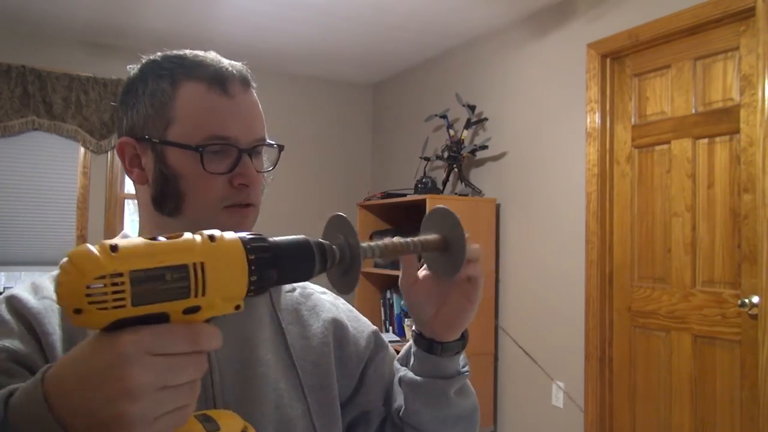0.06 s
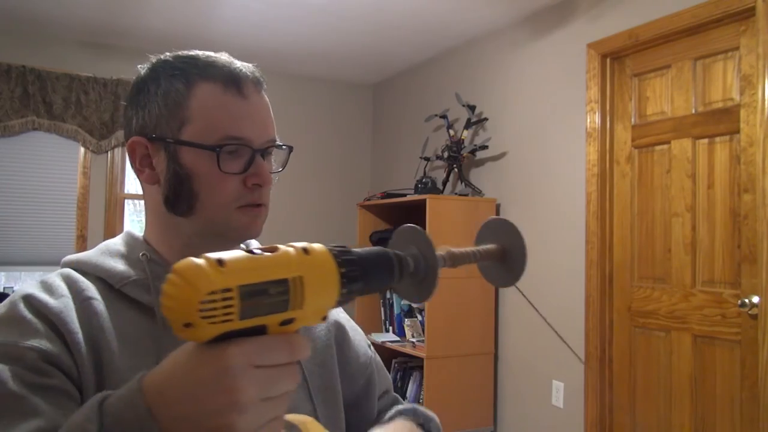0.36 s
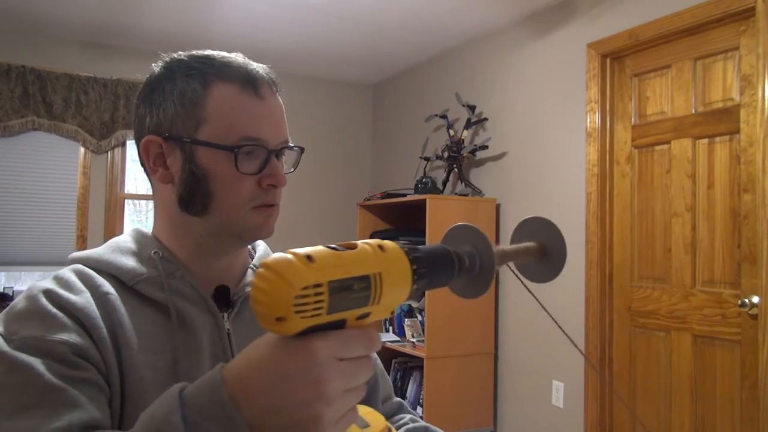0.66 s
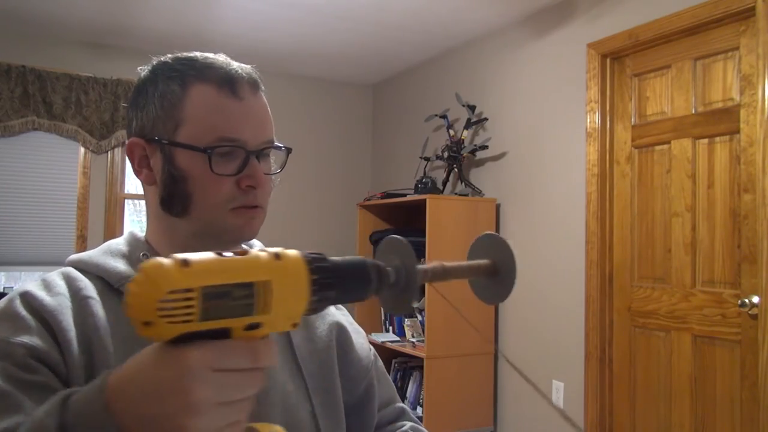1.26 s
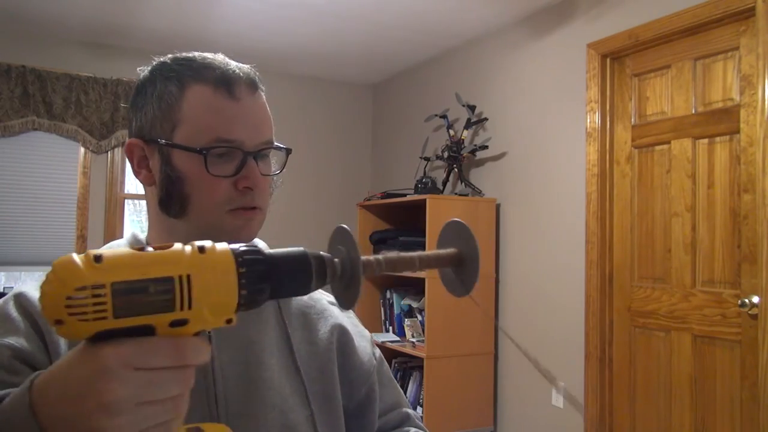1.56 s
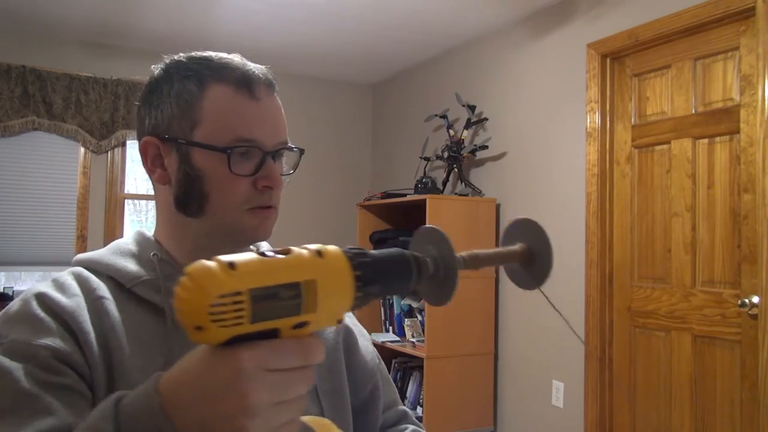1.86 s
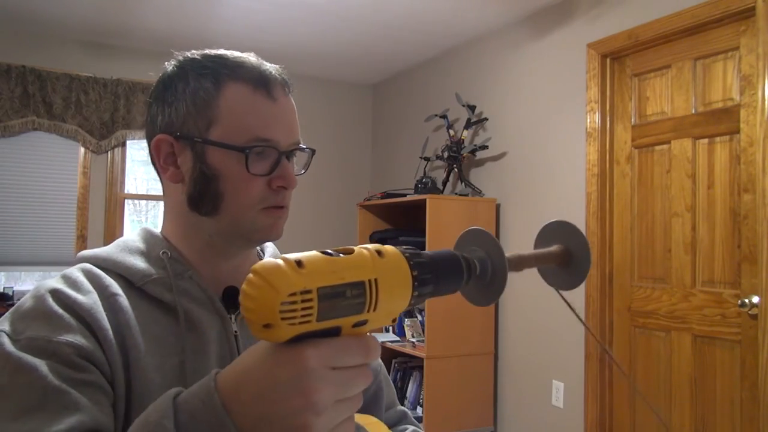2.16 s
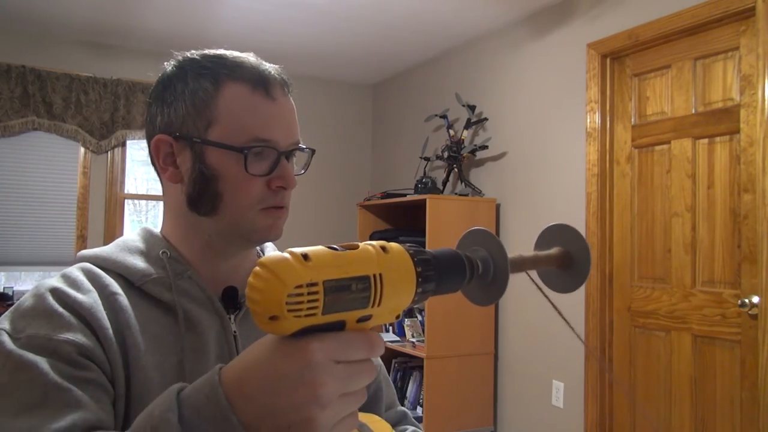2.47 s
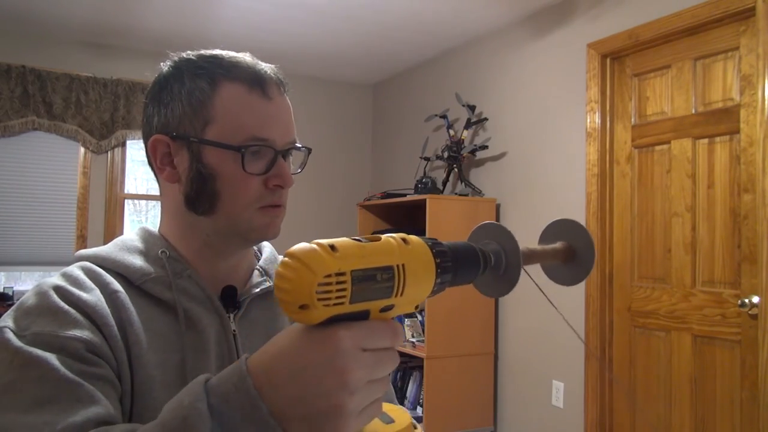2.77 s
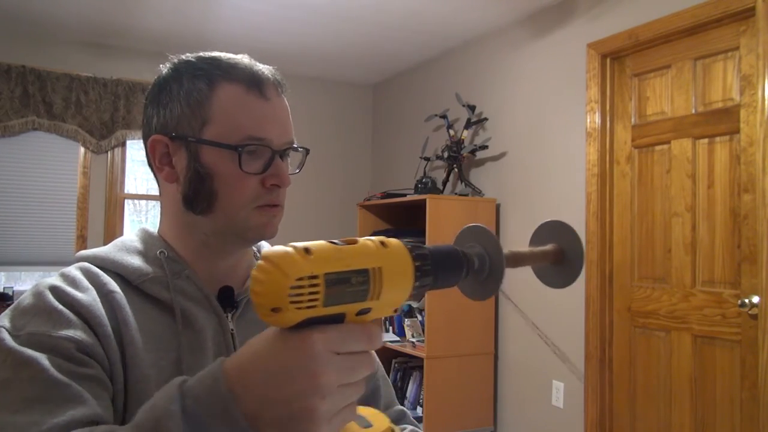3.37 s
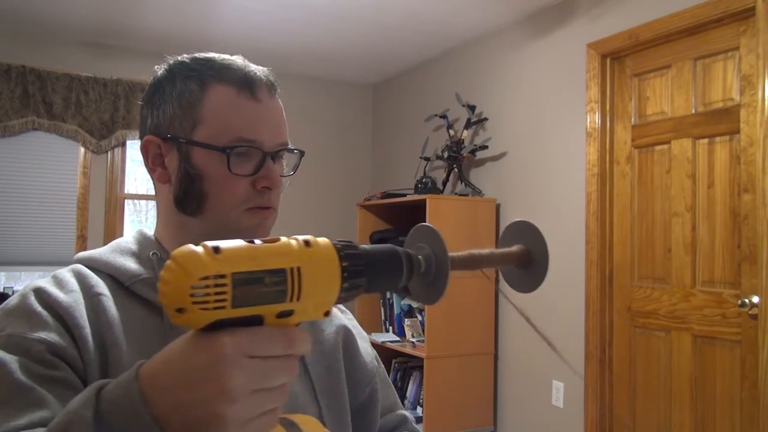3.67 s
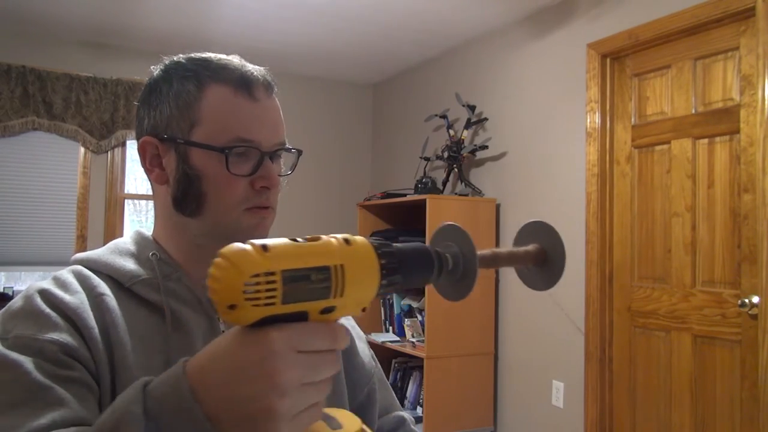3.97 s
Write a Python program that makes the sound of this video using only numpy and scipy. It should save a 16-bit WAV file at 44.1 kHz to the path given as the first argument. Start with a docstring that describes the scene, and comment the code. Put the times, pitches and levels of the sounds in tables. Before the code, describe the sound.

A cordless drill runs steadily with a loud, close whir and whine.

```python
"""Cordless drill winding string

A quiet room, a clip-on microphone close to a drill that winds string onto a bobbin. The trigger goes
from part to full speed at the start. The motor hums and whines on its shaft orders, the planetary gears
rattle in the plastic housing and hiss, and the treble shifts as the drill is moved about.
Underneath lie faint room rumble and a few soft handling bumps on the microphone."""
import sys
import numpy as np
from scipy.fft import rfft, irfft, next_fast_len
from scipy.io import wavfile
from scipy.ndimage import uniform_filter1d, map_coordinates

SR = 44100
rng = np.random.default_rng(int(sys.argv[2]) if len(sys.argv) > 2 else 0)


def to_wav(sig):
    """Store sig (one row per channel, or 1-D mono) as 16-bit WAV at the path in sys.argv[1].

    Samples outside -1..1 are clipped; the rate is SR.
    """
    pcm = np.clip(np.atleast_2d(sig), -1, 1) * 32767
    pcm = np.round(pcm).astype(np.int16)
    wavfile.write(sys.argv[1], SR, pcm.T)  # frames by channels


N = 176400

CARRIER_RATIO = 8 / 35  # turns of the planet carrier per turn of the motor shaft
SPLIT_HZ = 3180  # rattle below, hiss above
# noise of gears, brushes and fan, with the housing's peaks: f/Hz, relative level/dB
DRILL_SPECTRUM = [(160, -25.5), (240, -26.5), (330, -17.5), (450, -14.5), (560, -11.5), (700, -5),
                  (830, -4), (1020, -7.5), (1170, -6.5), (1270, -0.7), (1400, -1.5), (1600, -5), (1800, -6),
                  (2150, -6), (2500, -8.5), (2750, -6.5), (3150, -13.5), (3700, -10.5), (4300, -11.5),
                  (5000, -10.5), (6000, -9), (6900, -6), (7700, -7), (8400, -4), (9300, -7), (10600, -13),
                  (11600, -21), (12600, -28), (13600, -31.5), (15700, -31)]


def amp(db):
    """Decibels to gain."""
    return 10 ** (np.asarray(db) / 20)


def unit(x):
    """Scale to rms 1."""
    return x / np.sqrt(np.mean(x ** 2) + 1e-20)


def along(points, hz):
    """Interpolate (f/Hz, value) points on a log frequency axis."""
    freqs, values = np.transpose(points)
    return np.interp(np.log(hz + 1), np.log(freqs + 1), values)


def curves(rows):
    """One value per sample for each column after the time."""
    times, *columns = np.transpose(rows)
    return [np.interp(np.arange(N) / SR, times, column) for column in columns]


def wobble(rate):
    """A smooth random curve, rate knots a second."""
    return map_coordinates(rng.standard_normal(N // 20), [np.arange(N) * rate / SR], mode="mirror")


def filtered(x, response):
    """Pass x through a gain given as a function of f/Hz."""
    size = next_fast_len(N + SR // 2)
    return irfft(rfft(x, size) * response(np.fft.rfftfreq(size, 1 / SR)), size)[..., :N]


def tone(angle, db, flutter_db=1.05, smear_rad=.18):
    """A partial around an rms level, slightly unsteady in level and phase."""
    peak = np.sqrt(2) * amp(db + flutter_db * wobble(14))
    return peak * np.sin(angle + smear_rad * wobble(45) + rng.uniform(0, 2 * np.pi))


def motor(speed, angle, full_speed_hz=346, resonance=1.4):
    """Hum and whine on the shaft's orders; on the run-up, tones slide through the housing's peaks."""
    # motor tones: multiple of the shaft rate, level at full speed/dB
    shaft_orders = [(2, -46.5), (4, -41.5), (5, -40.5), (6, -47.5), (7, -48), (8, -52), (10, -51),
                    (13, -50), (16, -51), (20, -38.5), (21, -42.5), (22, -43), (23, -47), (25, -48),
                    (27, -47), (28, -45.5), (29, -47), (31, -51), (32, -55)]
    # hum at the shaft rate: t/s, level/dB
    hum_levels = [(0, -45), (.4, -41), (1, -39.5), (1.4, -41.5), (1.65, -46), (1.9, -40.5), (3.3, -40),
                  (3.8, -43), (4, -40)]
    # three strong whines that swell as the drill moves: t/s, then level/dB for each of whine_orders
    whine_levels = [(0, -39, -50, -46), (.12, -39, -50, -46), (.24, -38.5, -48, -38), (.4, -39, -42, -32),
                    (.6, -41, -35, -35), (.8, -37.5, -35.5, -38), (1.05, -40, -35.5, -35),
                    (1.6, -37, -45, -31.5), (1.9, -39.5, -39, -33), (2.15, -40.5, -36, -40),
                    (2.45, -40, -37.5, -42), (2.65, -36, -37.5, -43), (2.9, -37, -36, -41),
                    (3.2, -40.5, -32.5, -41), (3.5, -37.5, -36, -42), (3.8, -39.5, -40, -37),
                    (4, -39, -40, -38)]
    whine_orders = (12, 19, 24)
    tones = 0
    for order, db in shaft_orders:
        colour_db = along(DRILL_SPECTRUM, order * speed) - along(DRILL_SPECTRUM, order * full_speed_hz)
        tones += tone(order * angle, db + resonance * colour_db)  # tones feel the peaks more than noise
    hum = np.sqrt(2) * amp(curves(hum_levels)[0]) * np.sin(angle)
    whines = sum(tone(order * angle, db) for order, db in zip(whine_orders, curves(whine_levels)))
    return hum + tones + whines


def gear_tones(angle):
    """Meshing teeth sing between the motor's orders."""
    # gear tones: multiple of the planet carrier's rate, level/dB
    mesh_orders = [(49, -52), (50, -52), (52, -50), (55, -51), (58, -52), (60, -46.5), (65, -49.5),
                   (68, -52), (85, -45), (104, -45), (110, -44), (120, -49)]
    return sum(tone(order * CARRIER_RATIO * angle, db) for order, db in mesh_orders)


def housing(hz, ring_hz=1430, width_hz=81, lift=.25):
    """Response of the plastic housing to the rattle: one main ring, with bass and treble rolled off."""
    ring = 1 + lift / (1 + 2j * (hz - ring_hz) / width_hz)
    low_pass = 1 / np.sqrt(1 + (hz / SPLIT_HZ) ** 20)
    high_pass = hz ** 2 / (hz ** 2 + 110 ** 2)
    return ring * amp(along(DRILL_SPECTRUM, hz)) * low_pass * high_pass


def rattle(speed, knocks_per_turn=4, knock_share=.42, spread_db=2):
    """Loose teeth knock at random in the housing over a rush of air, a little louder on the run-up."""
    # gear rattle: t/s, base level/dB
    rattle_levels = [(0, -27), (.45, -27.6), (.9, -28), (1.25, -27), (1.5, -28.5), (1.75, -27.5),
                     (2.05, -28), (2.35, -28), (2.85, -28), (3.15, -28), (3.5, -29), (3.85, -27.5),
                     (4, -28.5)]
    hits = rng.random(N) < knocks_per_turn * speed / SR
    knocks = unit(hits * rng.choice([-1, 1], N) * amp(spread_db * rng.standard_normal(N)))
    air = rng.standard_normal(N)
    drive = np.sqrt(knock_share) * knocks + np.sqrt(1 - knock_share) * air
    acceleration = uniform_filter1d(np.gradient(speed) * SR, SR // 20)
    surge_db = .5 * acceleration / 990  # half a dB at 990 Hz/s
    return amp(curves(rattle_levels)[0] + surge_db) * unit(filtered(drive, housing))


def hiss(angle, base_db=-25, planets=3, planet_depth=.14, brush_depth=.1):
    """Sliding teeth and brushes hiss, pulsing with each passing planet and with the shaft."""
    planet_pulse = np.sin(planets * CARRIER_RATIO * angle)
    brush_pulse = sum(np.sin(order * angle + rng.uniform(0, 2 * np.pi)) for order in (1, 3, 4))
    pulsing = 1 + planet_depth * planet_pulse + brush_depth * brush_pulse
    treble = lambda hz: amp(along(DRILL_SPECTRUM, hz)) * np.sqrt(1 - 1 / (1 + (hz / SPLIT_HZ) ** 20))
    return amp(base_db) * unit(filtered(pulsing * rng.standard_normal(N), treble))


def moved_about(noise):
    """Five treble bands slowly rise and fall as the drill moves in front of the microphone."""
    # treble shifts: t/s, then gain/dB at each of the five inner centres_hz
    band_gains = [(0, 0.56, 2, -1.7, -3.4, 3.5), (0.1, 0.39, 2, -1.3, -8, 3),
                  (0.2, 1.2, 2.5, -0.8, -1.9, 3), (0.4, -0.37, 1.5, -0.67, -0.2, 0),
                  (0.7, 0.2, -2.5, 0.72, 1, -0.8), (1.0, -0.028, -1, 0.91, 0.5, -0.5),
                  (1.3, -0.011, 2.2, 0.57, -0.4, -0.7), (1.65, 1.0, 3, -0.5, -3.3, 0.8),
                  (2.0, -0.87, -0.3, -0.7, 0.5, -0.5), (2.5, 0.4, -2, -0.3, 0.5, 0.4),
                  (2.85, -0.8, -2.5, -0.34, 1.3, -1), (3.2, -0.55, -3.3, 0.56, 1.5, -1.5),
                  (3.5, -0.6, -0.3, 0.1, 0.3, -0.7), (3.8, -0.2, 1.1, 0.0, 0, 0),
                  (4.0, 0.88, -1, -0.0, 1, -0.0)]
    centres_hz = (1700, 2340, 3730, 5340, 7100, 9800, 11500)
    gains_db = [0, *curves(band_gains), 0]  # the outer bands hold steady
    shifted = 0
    for db, weights in zip(gains_db, np.eye(len(centres_hz))):
        band = list(zip(centres_hz, weights))
        shifted += amp(db) * filtered(noise, lambda hz: along(band, hz))
    return shifted


def reflected(x, count=10, echo_db=-13.5, span_s=.025):
    """The direct sound and its weak early echoes from the body and the nearby walls."""
    delays = (rng.uniform(.1, 1, count) * span_s * SR).astype(int)
    signs = rng.choice([-1, 1], count)
    echoes = sum(sign * np.roll(x, delay) for delay, sign in zip(delays, signs))
    return (x + amp(echo_db) * echoes / np.sqrt(count)) / np.hypot(1, amp(echo_db))


def room_rumble(level_db=-60.5, swell_db=4.5):
    """Faint, uneven low noise of the room."""
    # room tone: f/Hz, relative level/dB
    room_spectrum = [(10, -19), (22, -2), (45, -1.5), (70, -6), (130, -14), (300, -6), (1000, -70)]
    gain = amp(level_db + swell_db * wobble(5))
    return gain * unit(filtered(rng.standard_normal(N), lambda hz: amp(along(room_spectrum, hz))))


def handling_bumps(half_length_cycles=3.1):
    """Handling gives the microphone short, dull pushes of noise; the deeper ones last longer."""
    # bumps on the microphone: t/s, level at the crest/dB, upper edge f/Hz
    bumps = [(.12, -55, 55), (.8, -47, 200), (1.66, -54, 55), (3.15, -55, 110)]
    t = np.arange(N) / SR
    thuds = 0
    for at_s, db, edge_hz in bumps:
        envelope = np.exp(-((t - at_s) * edge_hz / half_length_cycles) ** 2)
        dull = lambda hz: hz / (hz + 20) / (1 + (hz / edge_hz) ** 4)
        thuds += amp(db) * envelope * unit(filtered(rng.standard_normal(N), dull))
    return thuds


def scene():
    """One shaft drives all the drill's sounds; a single close microphone feeds both channels."""
    # motor shaft, from part to full speed: t/s, rotation f/Hz
    shaft_speed = [(0, 268.4), (0.135, 268.7), (0.18, 306.3), (0.22, 329.5), (0.28, 340.3), (0.35, 342.9),
                   (0.45, 345.9), (0.9, 346.4), (1.17, 347.5), (1.45, 346.9), (1.6, 345.7), (1.85, 345.5),
                   (2.15, 346.5), (2.45, 345.4), (3.0, 345.8), (3.4, 346.5), (4.0, 345.1)]
    speed, = curves(shaft_speed)
    jitter_rad = .012 * wobble(20)
    angle = 2 * np.pi * np.cumsum(speed) / SR + jitter_rad
    tones = motor(speed, angle) + gear_tones(angle)
    noise = reflected(moved_about(rattle(speed) + hiss(angle)))
    mono = tones + noise + room_rumble() + handling_bumps()
    return np.array([mono, mono])


def record(dry):
    """The recorder keeps nothing above 15750 Hz."""
    return filtered(dry, lambda hz: hz < 15750)


dry = scene()
out = record(dry)
to_wav(out)
```